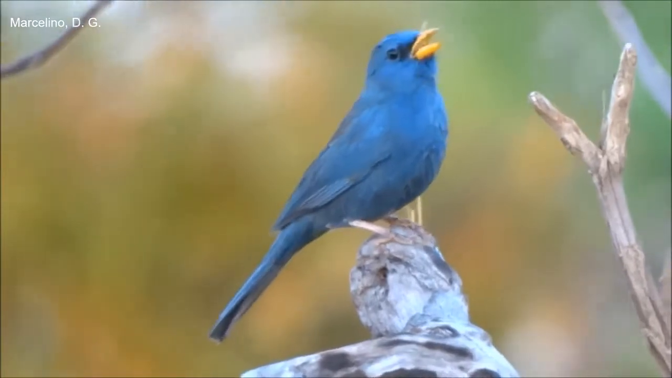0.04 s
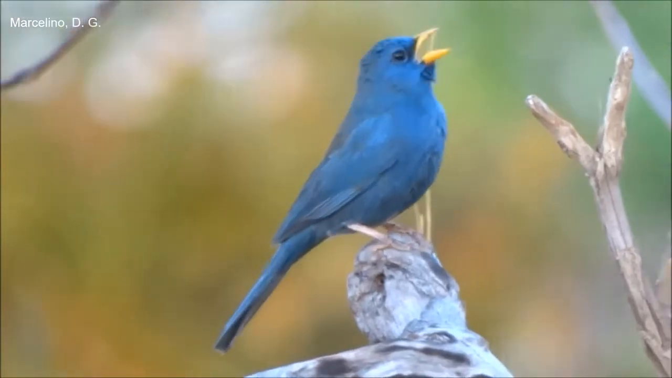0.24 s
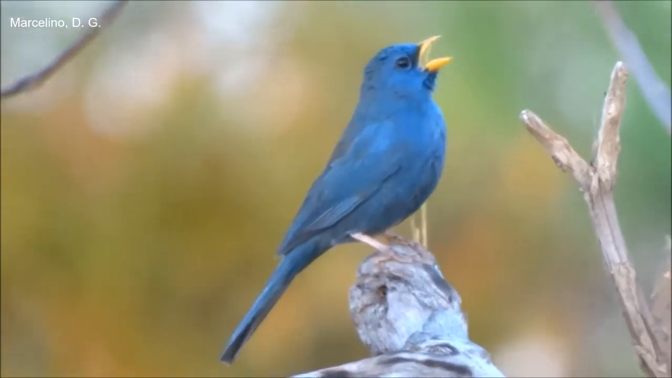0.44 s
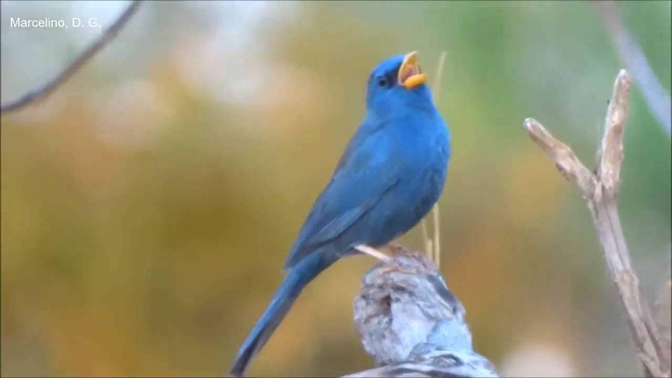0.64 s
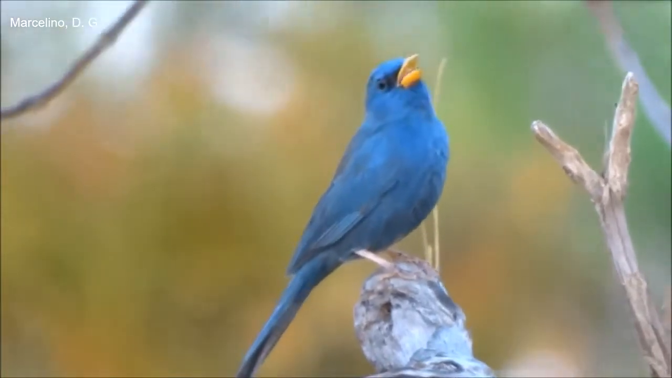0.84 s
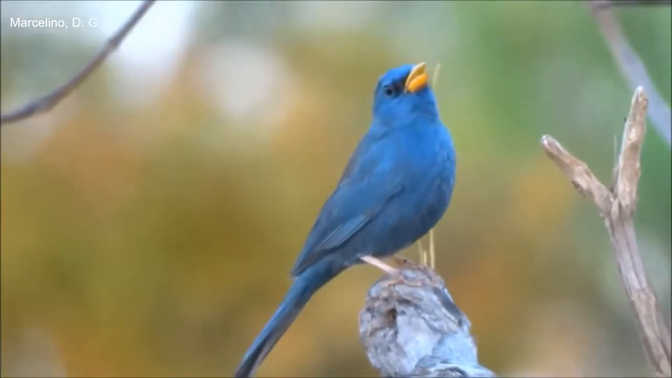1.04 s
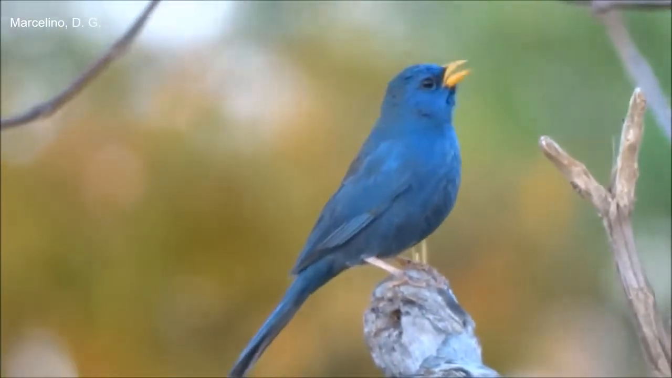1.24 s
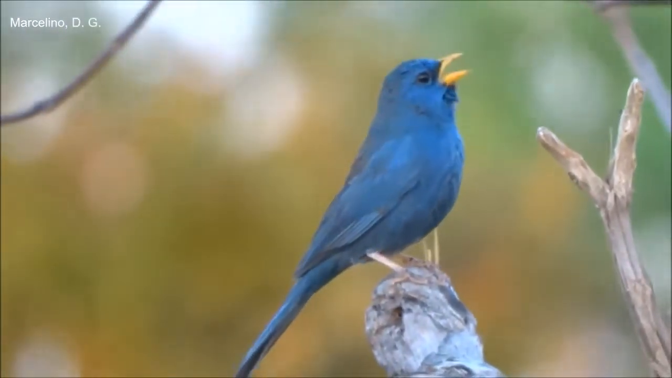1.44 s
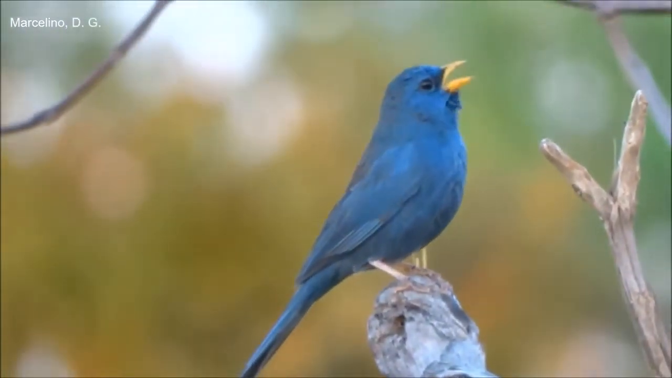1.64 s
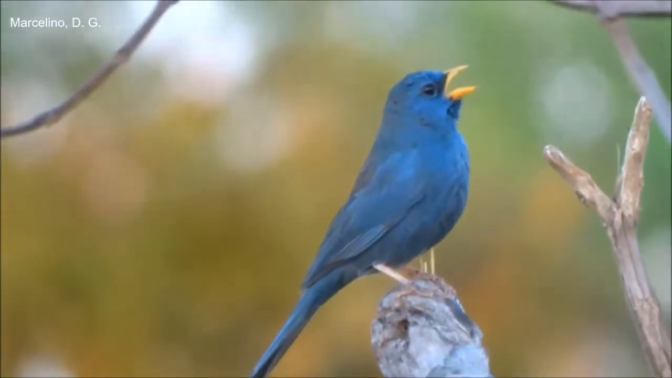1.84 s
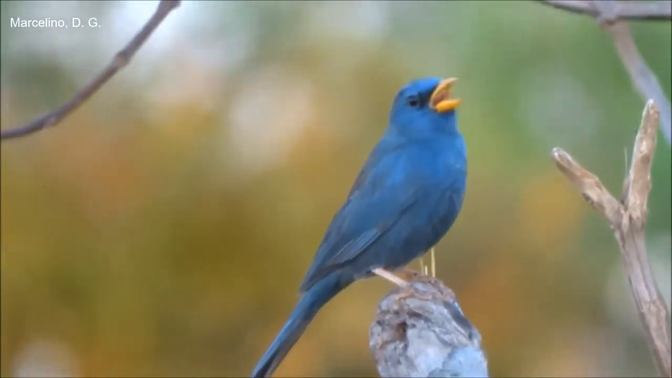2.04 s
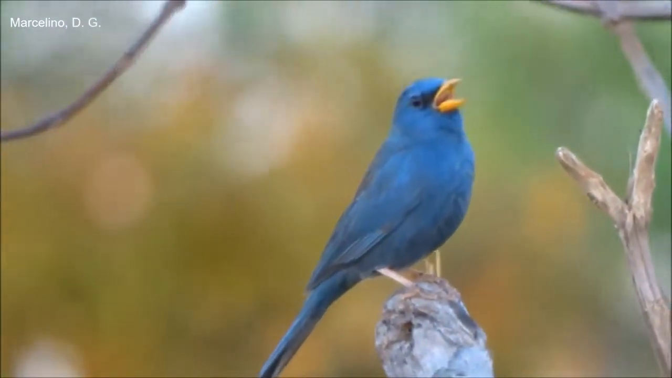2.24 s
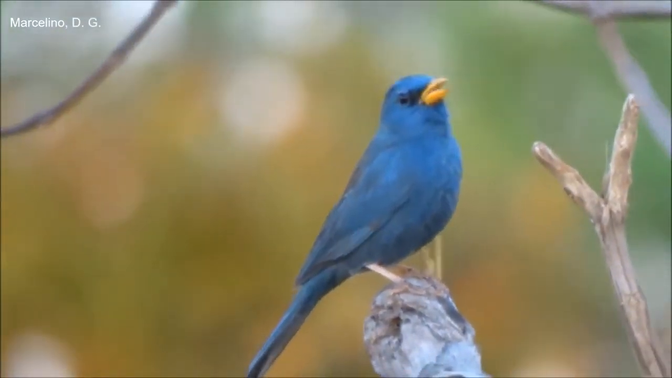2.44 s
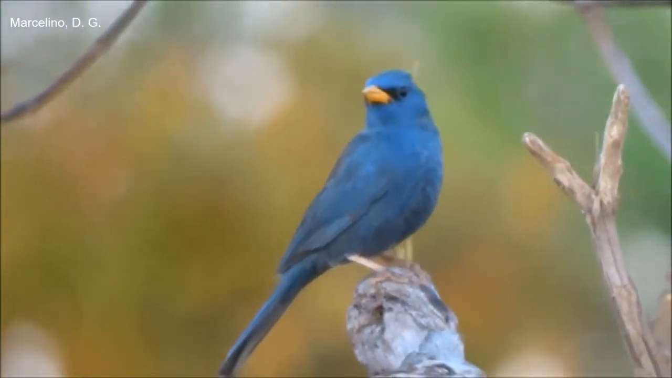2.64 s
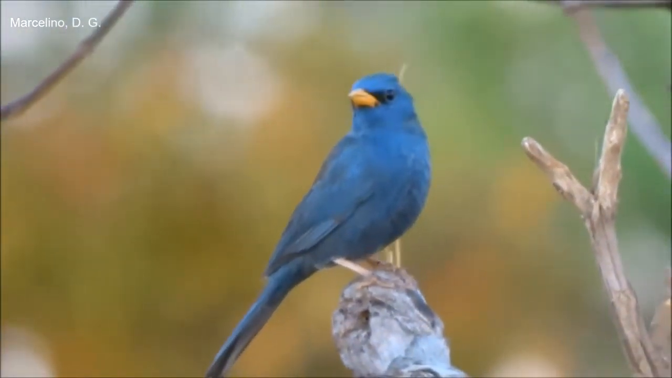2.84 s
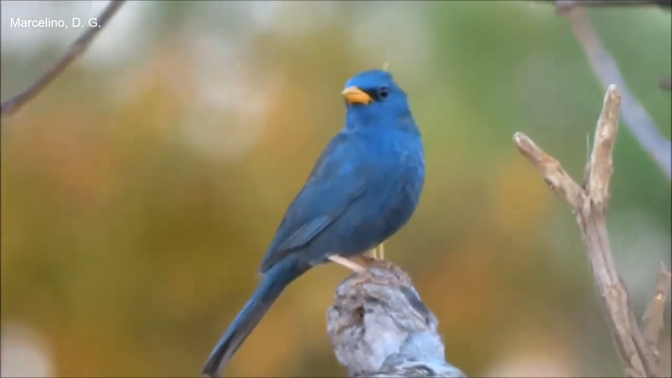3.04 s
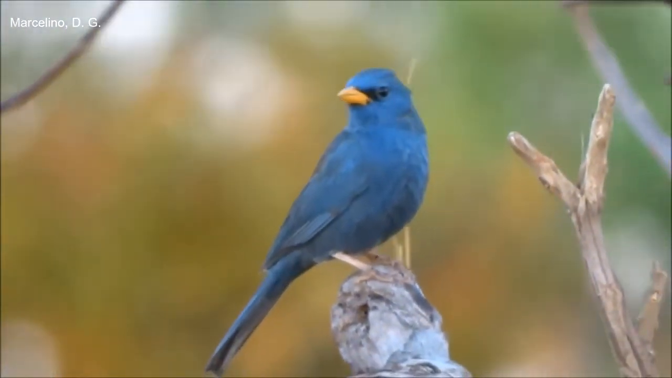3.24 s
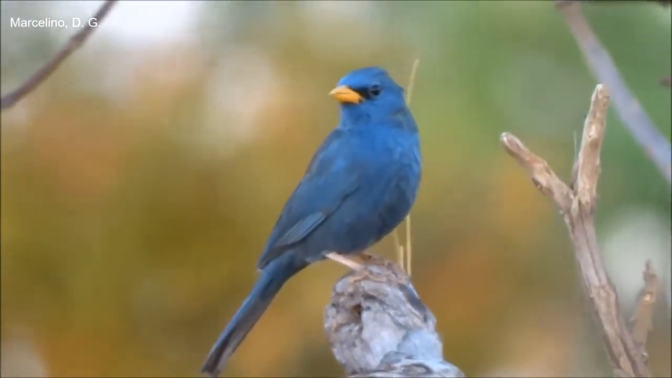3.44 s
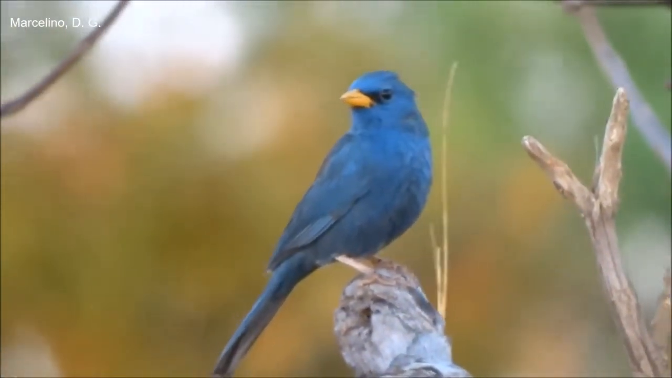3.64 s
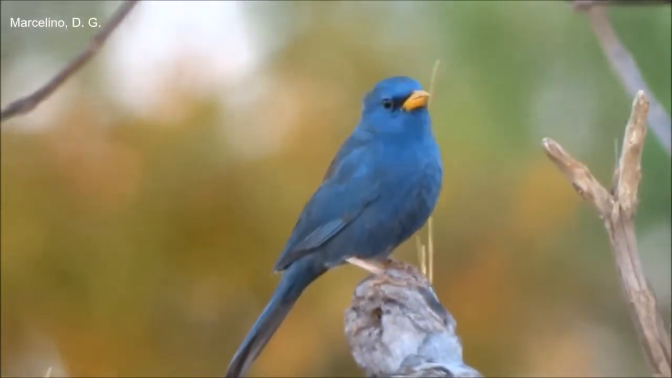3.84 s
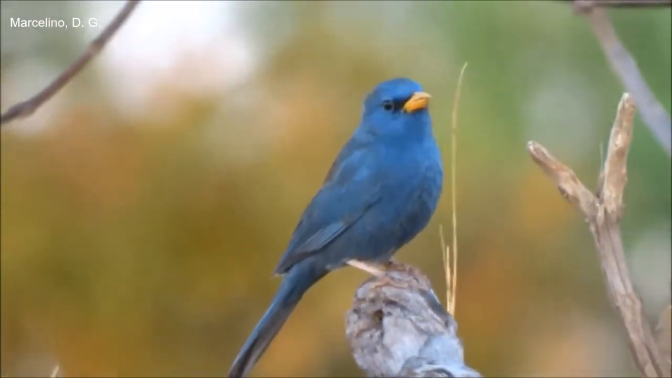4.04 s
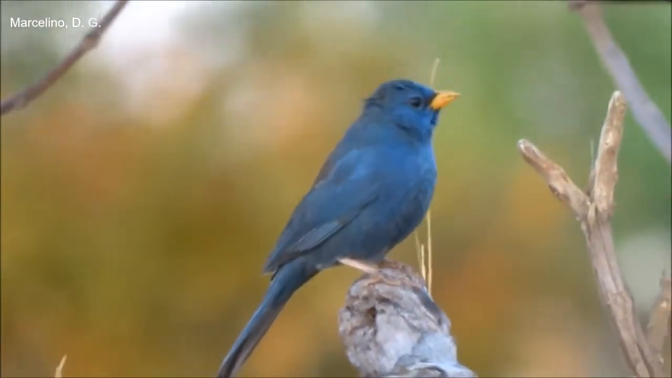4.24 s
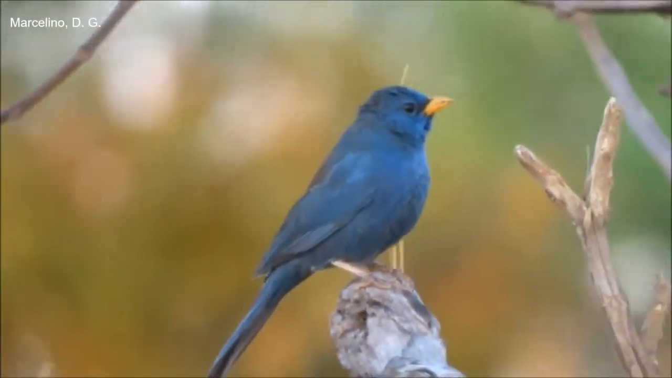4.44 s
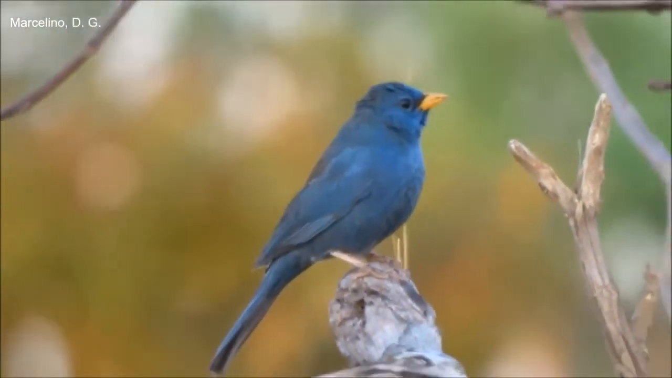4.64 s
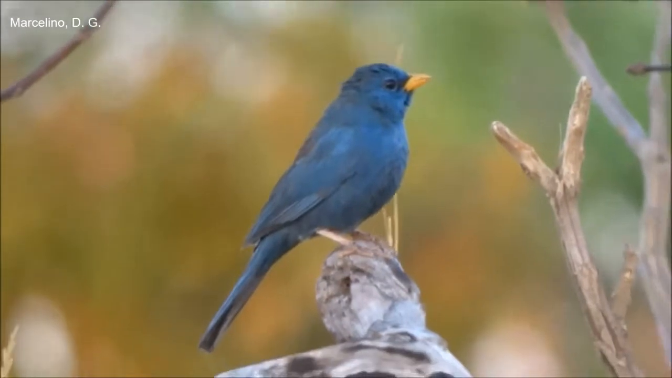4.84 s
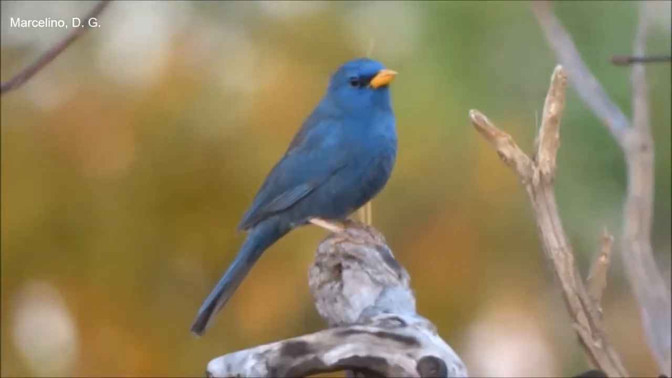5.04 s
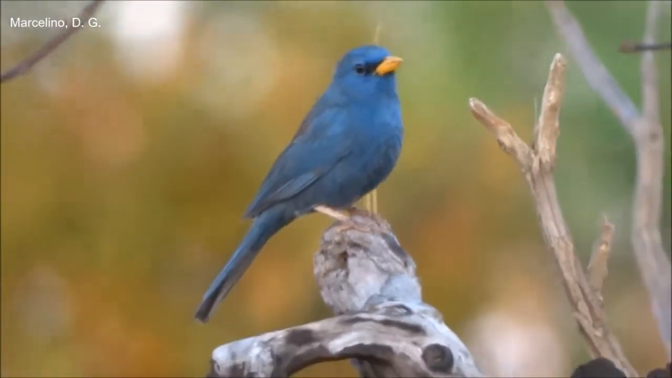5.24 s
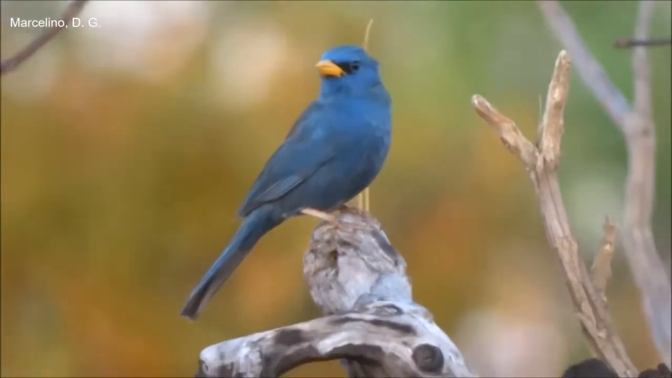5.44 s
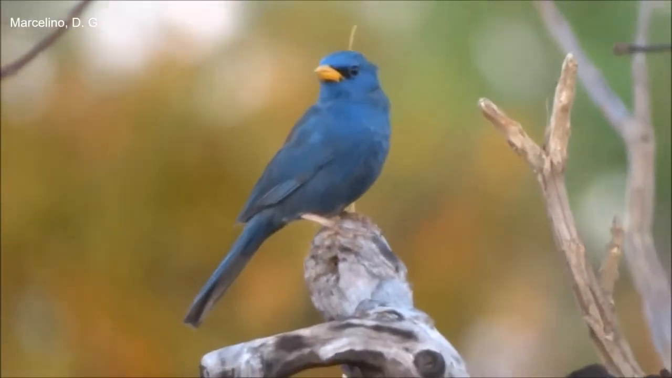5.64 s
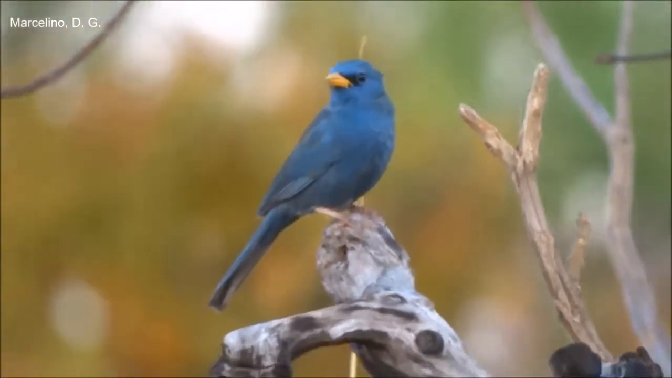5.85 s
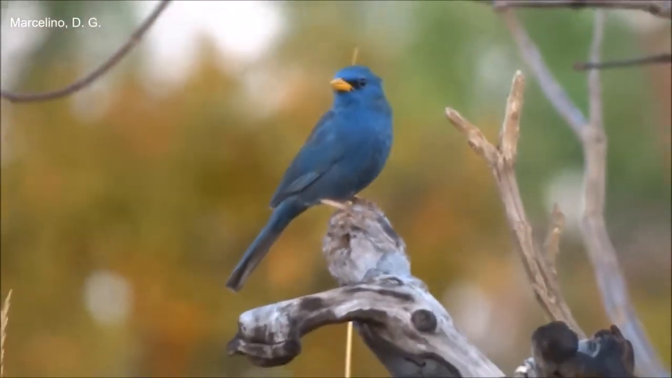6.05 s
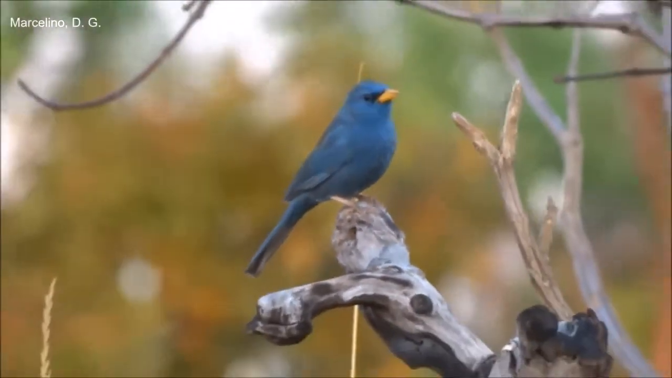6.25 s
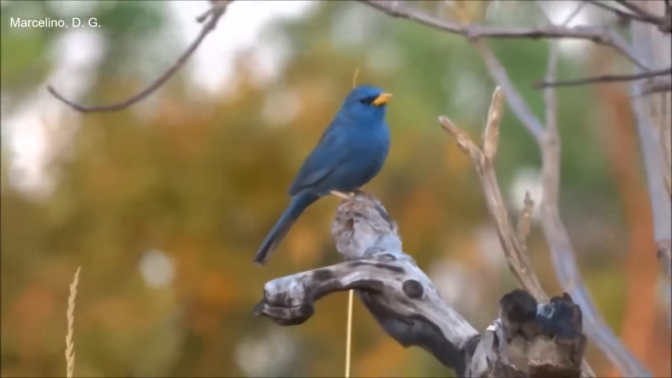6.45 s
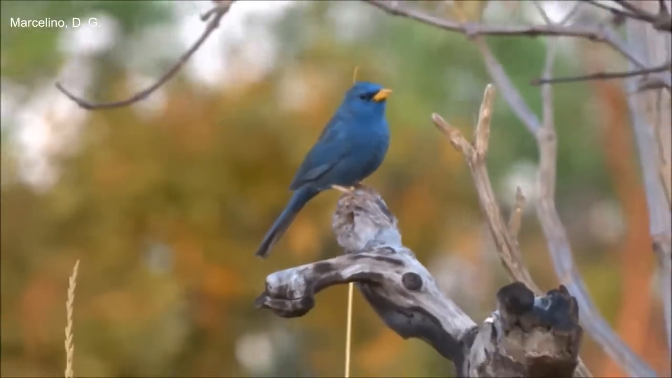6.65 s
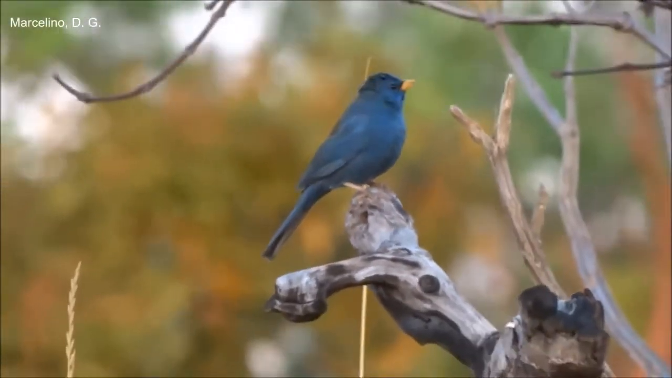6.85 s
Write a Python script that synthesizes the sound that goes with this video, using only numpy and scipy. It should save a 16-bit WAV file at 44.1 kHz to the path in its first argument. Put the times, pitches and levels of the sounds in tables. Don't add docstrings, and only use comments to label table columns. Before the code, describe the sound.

A small finch sings piercing, throbbing whistled sweeps that rise and fall over steady leaf hiss, then goes quiet in the breeze.

```python
import sys
import numpy as np
from scipy import signal
from scipy.fft import rfft, irfft, next_fast_len
from scipy.io import wavfile
from scipy.ndimage import uniform_filter1d, minimum_filter1d

SR = 44100
rng = np.random.default_rng(int(sys.argv[2]) if len(sys.argv) > 2 else 0)


def to_linear_factor(level_db):
    exponent = np.asarray(level_db, float) / 20
    return 10 ** exponent


def to_wav(sig):
    pcm = np.clip(np.atleast_2d(sig), -1, 1) * 32767
    pcm = np.round(pcm).astype(np.int16)
    wavfile.write(sys.argv[1], SR, pcm.T)


N = 304731
SIZE = next_fast_len(N)
T = np.arange(N) / SR
HZ = np.maximum(np.fft.rfftfreq(SIZE, 1 / SR), 1)

# (time [s], breeze level [dB], dry rustle level [dB])
BREEZE = [
    (0.0, -21.5, 1),
    (0.96, -21.5, 5),
    (1.0, -22.5, 6),
    (3.42, -23.5, -4.5),
    (4.35, -21, 2),
    (4.79, -23, -9),
    (5.74, -22.5, -7),
    (6.62, -25, 3),
    (6.91, -23, -10),
]
# (frequency [Hz], density [dB per Hz])
RUSH_COLOUR = [(25, -70), (90, -38), (130, -20.5), (220, -14), (350, -11.5), (465, -4), (960, 0),
               (1250, -4), (2000, -4), (2500, -8), (3200, -11), (5000, -26), (9000, -70), (13000, -110)]
# (frequency [Hz], density [dB per Hz])
TREBLE_COLOUR = [(2000, -32.5), (3000, -13.5), (3900, -7.5), (4300, -9.5), (4600, -13.5), (5200, -13.5),
                 (6200, -9), (7000, -14), (7950, -13.5), (8300, -21.5), (8700, -58), (12500, -110)]
# (frequency [Hz], density [dB per Hz])
SHEEN_COLOUR = [(7800, -54), (8400, -25), (9400, -23), (10500, -30), (11800, -39), (12300, -42),
                (12900, -60), (13500, -89), (17000, -110)]
# (frequency [Hz], density [dB per Hz])
RUSTLE_COLOUR = [(4100, -44), (4500, -18), (5400, -19.5), (6000, -36), (9000, -110)]
# (frequency [Hz], side minus mid [dB])
LEAF_WIDTH = [(60, -51), (300, -29), (900, -17), (2600, -12), (4500, -14), (7600, -18), (9500, -5),
              (12000, -12)]

# (time [s], length [s], start pitch [Hz], end pitch [Hz], level [dB])
FAR_CHIPS = [(.335, 0.089, 3900, 4140, -35), (.41, 0.018, 4800, 4810, -27), (.475, 0.017, 4720, 4900, -26),
             (.493, .014, 4900, 4780, -31), (.565, .015, 4850, 4900, -33), (.64, .022, 4470, 4820, -30),
             (.72, 0.04, 4500, 4870, -32), (.792, 0.035, 4450, 4700, -25), (0.882, 0.023, 4750, 4700, -18),
             (.966, .012, 5700, 5430, -26), (0.97, .014, 4750, 4480, -23), (1.028, .01, 5600, 5150, -26),
             (1.034, 0.009, 5200, 4500, -31), (1.043, .009, 4560, 4050, -25),
             (3.648, 0.077, 3720, 3870, -29.5), (3.717, 0.013, 4195, 4500, -31),
             (3.776, .014, 3680, 3850, -32), (3.72, .02, 4650, 4820, -28.5),
             (3.793, 0.024, 4780, 4860, -27), (3.872, 0.022, 4650, 4830, -26),
             (3.911, .018, 4720, 4900, -32), (3.949, 0.024, 4450, 4900, -25),
             (4.017, 0.03, 4300, 4780, -29.5)]

# (time [s], peak level [dB], left minus right [dB], ring [Hz])
TWIG_TICKS = [(.41, -46.5, 2, 12200), (1.3688, -33, -1, 13600), (1.4666, -38, 1, 13800),
              (1.6287, -28, -2, 9500), (1.6616, -39, 2, 13800), (1.8911, -42, 0, 13700),
              (2.9627, -36, 3, 14000), (3.51, -42, 0, 13800), (3.6845, -44, 7, 13800),
              (5.1243, -34, -3, 11000), (5.13, -30, 0, 4400)]

# (frequency [Hz], density [dB per Hz])
BUFFET_COLOUR = [(15, -36), (30, -24), (60, -7), (90, -3), (160, -6), (300, -36), (1000, -46), (8000, -110)]
# (frequency [Hz], density [dB per Hz])
EDDY_COLOUR = [(60, -36), (140, -3.5), (280, -6), (600, -3.5), (1000, -17), (1500, -26), (3000, -50),
               (9000, -110)]
# (time [s], rumble level [dB], half width [s], eddies over rumble [dB])
WIND_PUFFS = [(0, -57, .05, -15), (.48, -64, .08, -10), (.88, -65, .08, -1), (1.1, -68, .12, -1),
              (1.37, -55, 0.043, 10), (1.7, -56, .06, -13), (2.18, -40, .025, 16), (2.25, -42, 0.032, 1),
              (2.55, -49.5, 0.21, 2), (3, -49, .08, -1), (3.31, -49, 0.15, 6.5), (3.65, -46, 0.12, 7),
              (3.89, -43, 0.14, 2), (4.25, -46.5, 0.24, 3), (4.68, -51, 0.17, 12), (4.84, -42, 0.12, 3),
              (5.05, -61, 0.16, 13), (5.25, -51, 0.14, 8), (5.46, -53, 0.058, 7), (5.7, -50, 0.19, -2),
              (6.43, -63, .08, -1), (6.91, -64, .06, -8)]
# (time [s], peak level [dB], pitch [Hz], length [s], left minus right [dB])
PORT_KNOCKS = [
    (1.365, -36, 111, .02, -2),
    (2.163, -25, 230, 0.0081, 9),
    (2.182, -15, 390, 0.0081, 0),
    (2.189, -18.5, 280, 0.0096, 13),
    (2.185, -17, 730, .01, 5),
    (2.243, -38, 113.5, .03, 1),
    (3.672, -20, 298, 0.0072, 4),
    (4.674, -34, 120, 0.037, 3),
]

RETURN_MS = [2.786, 2.718, 1.781, .944, 3.221]
RETURN_SHARE = [.73, .2, .1, -.14, -.08]
# (time from bottom of hook [s], pitch [Hz], level [dB])
GRACE_NOTE = [
    (-.091, 6250, -36),
    (-.075, 5840, -20),
    (-.059, 5250, -27),
    (-.044, 4900, -26),
]
# (time from bottom of hook [s], pitch [Hz], level [dB])
HOOK_NOTE = [
    (-.042, 6800, -31),
    (-.028, 5950, -21.5),
    (-.015, 5570, -22),
    (0, 5390, -22.5),
    (.011, 5820, -14.5),
    (0.025, 6150, -19.5),
]
# (time of hook bottom [s], opening pitch shift [Hz], opening level [dB],
#           head sway delay at start [ms], head sway delay at end [ms])
SONG_PHRASES = [
    (-.1, 0, -2, -.005, -.014),
    (.239, 51, 2, -0.011, -0.0025),
    (1.481, -61, 0, 0.0075, -0.005),
    (1.774, -14, 1, 0.0045, -.012),
]
# (time [s], pitch [Hz])
SWEEP_PITCH = [
    [(.003, 6864), (.03, 7120)],
    [(.289, 6620), (.333, 6930), (.376, 7630), (.465, 8320), (.517, 8185), (.678, 6235), (.746, 5620),
     (.963, 4040), (1.09, 3540)],
    [(1.542, 6310), (1.571, 6890), (1.595, 6920)],
    [(1.857, 6750), (1.947, 7900), (2.016, 8320), (2.052, 8255), (2.169, 7185), (2.212, 6590),
     (2.409, 4913), (2.54, 4180), (2.582, 4050)],
]
# (time [s], level [dB])
SWEEP_EFFORT = [
    [(.003, -19.5), (.016, -21), (.03, -25)],
    [(.29, -18), (.313, -13), (.385, -12.5), (.418, -23), (.46, -21.5), (.538, -16.5), (.635, -4),
     (.81, -17), (1.09, -33)],
    [(1.544, -22), (1.565, -15.5), (1.59, -15), (1.596, -40)],
    [(1.84, -18), (1.918, -15), (1.985, -25), (2.03, -23.5), (2.075, -18), (2.172, -6.5), (2.272, -13),
     (2.42, -20), (2.582, -30)],
]
# (time [s], half width [s], pitch lift [Hz], swell [dB])
VOICE_CATCHES = [
    (.872, .035, 81, 5.5),
    (.93, 0.0255, 49, 6),
    (1.015, .035, 75, 8),
    (1.052, .01, -21, -8),
    (1.905, 0.022, 71, -0.5),
    (2.172, 0.019, 50, -2),
    (2.395, .025, 52, -2.5),
    (2.505, 0.016, 52, 2.5),
    (2.535, .008, -40, -4),
]


def unit(x):
    return x / np.sqrt(np.mean(x ** 2))


def curve(table, column):
    rows = np.array(table)
    return np.interp(T, rows[:, 0], rows[:, column])


def shape(points):
    rows = np.array(points)
    return np.interp(np.log(HZ), np.log(rows[:, 0]), rows[:, 1])


def band_rms(x, lo_hz, hi_hz):
    spectrum = rfft(x, SIZE)[(HZ > lo_hz) & (HZ < hi_hz)]
    return np.sqrt(2 * np.sum(np.abs(spectrum) ** 2) / SIZE / N)


def noise(db):
    return irfft(rfft(rng.standard_normal(SIZE)) * to_linear_factor(db), SIZE)[:N]


def mid_side_noise(db):
    return np.array([noise(db), noise(db + shape(LEAF_WIDTH))])


def walk(rate):
    hold = int(SR / rate)
    steps = np.repeat(rng.standard_normal(N // hold + 1), hold)
    return uniform_filter1d(uniform_filter1d(steps, hold), hold)[:N]


def pan(x, db):
    return x * to_linear_factor(np.array([[db], [-db]]) / 2)


def scatter(x, t60, wide):
    t = T[:SR // 2]
    mid, side = rng.standard_normal((2, len(t))) * to_linear_factor(-60 * t / t60) * (t > .004)
    tail = np.array([mid + wide * side, mid - wide * side]) / np.sqrt(np.sum(mid ** 2))
    return signal.fftconvolve(x[None], tail, axes=1)[:, :N]


def leaves(flicker_db=0.38):
    rush = 0
    for hz in 60 * 2. ** np.arange(8):
        window = np.cos(np.pi / 2 * np.clip(np.log2(HZ / hz), -1, 1))
        band = mid_side_noise(shape(RUSH_COLOUR) + 20 * np.log10(window + 1e-9))
        rush = rush + to_linear_factor(flicker_db * walk(3.595)) * band
    level, dry_db = curve(BREEZE, 1), curve(BREEZE, 2)
    breeze_db = level - level.mean()
    late_s = np.maximum(T - 5.7, 0)
    treble_db = 0.04 + 0.15 * breeze_db + 0.056 * dry_db - 2 * late_s
    sheen_db = 1.2 + 0.3 * breeze_db + 0.11 * dry_db - 1 * late_s
    treble = to_linear_factor(treble_db) * mid_side_noise(shape(TREBLE_COLOUR))
    sheen = to_linear_factor(sheen_db) * mid_side_noise(shape(SHEEN_COLOUR))
    rustle = to_linear_factor(dry_db) * mid_side_noise(shape(RUSTLE_COLOUR))
    foliage = rush + treble + sheen + rustle
    mid, side = to_linear_factor(level) * foliage / band_rms(rush[0], 400, 2500)
    return np.array([mid + side, mid - side])


def glints(width_hz=170, rare=1.15, rarer_early=.12, level_db=-65):
    out = 0
    for hz in (12750, 13100, 13500, 13900, 14250):
        gate = walk(30) > rare - rarer_early * np.tanh(T - 4.5)
        hiss = unit(noise(-200. * (abs(HZ - hz) > width_hz)))
        out = out + uniform_filter1d(1. * gate, size=300) * hiss
    return pan(to_linear_factor(level_db) * out, 0)


def far_bird(scrub_db=-11):
    voice = np.zeros(N)
    for s, length, start_hz, end_hz, db in FAR_CHIPS:
        on = (T > s) & (T < s + length)
        u = (T[on] - s) / length
        pitch = end_hz + (start_hz - end_hz) * ((1 - u) ** 3 + .25 * u ** 4)
        swell = np.sin(np.pi * u) ** .45
        voice[on] += np.sqrt(2) * to_linear_factor(db) * swell * np.sin(2 * np.pi * np.cumsum(pitch) / SR)
    return pan(voice, 1.5) + to_linear_factor(scrub_db) * scatter(voice, .25, .4)


def twigs(t60=.003, snap=.8):
    out, t = np.zeros((2, N + SR)), T[:SR // 50]
    for s, db, pan_db, hz in TWIG_TICKS:
        tick = np.sin(2 * np.pi * hz * t) * to_linear_factor(-60 * t / t60)
        tick[:2] += [snap, -snap]
        start = int(s * SR)
        out[:, start:start + len(t)] += pan(to_linear_factor(db + 8.0) * tick, pan_db)
    return out[:, :N]


def puffs(calm_db=-75, calm_eddy_db=-64):
    rumble, eddies = to_linear_factor(calm_db) ** 2, to_linear_factor(calm_eddy_db) ** 2
    for s, db, half_s, eddy_db in WIND_PUFFS:
        bell = np.exp(-2 * ((T - s) / half_s) ** 2)
        rumble = rumble + to_linear_factor(db) ** 2 * bell
        eddies = eddies + to_linear_factor(db + eddy_db) ** 2 * bell
    return np.sqrt(rumble), np.sqrt(eddies)


def wind(alike=.94):
    both, left, right = (unit(noise(shape(BUFFET_COLOUR))) * to_linear_factor(3 * walk(14)) for _ in range(3))
    rumble, eddies = puffs()
    apart = np.sqrt(1 - min(alike, 1) ** 2) * np.array([left, right])
    out = rumble * to_linear_factor(-2.5) * (alike * both + apart)
    flutter = [unit(noise(shape(EDDY_COLOUR))) * to_linear_factor(6 * walk(30)) for _ in range(2)]
    out = out + eddies * np.array(flutter)
    for s, db, hz, length, pan_db in PORT_KNOCKS:
        bell = np.exp(-4 * ((T - s) / length) ** 2)
        out = out + pan(to_linear_factor(db) * bell * np.cos(2 * np.pi * hz * (T - s)), pan_db)
    return out


def glide(t, s, hz):
    step = np.diff(s)
    chord = np.diff(hz) / step
    inner = (chord[:-1] * step[1:] + chord[1:] * step[:-1]) / (step[1:] + step[:-1])
    slope = np.r_[chord[0], inner, chord[-1]]
    k = np.clip(np.searchsorted(s, t) - 1, 0, len(step) - 1)
    u = np.clip((t - s[k]) / step[k], 0, 1)
    bend = (1 - u) * (slope[k] - chord[k]) - u * (slope[k + 1] - chord[k])
    return hz[k] + u * step[k] * (chord[k] + (1 - u) * bend)


def notes():
    for phrase, sweep, effort in zip(SONG_PHRASES, SWEEP_PITCH, SWEEP_EFFORT):
        s, shift_hz, db, sway_start, sway_end = phrase
        grace = np.add(GRACE_NOTE, [s, shift_hz, db])
        hook = np.add(HOOK_NOTE, [s, shift_hz, db])
        yield grace[:, :2], grace[:, ::2], [sway_start, sway_start]
        yield np.r_[hook[:, :2], sweep], np.r_[hook[:, ::2], effort], [sway_start, sway_end]


def finch(waver_hz=15., rasp_db=0.2, edge_s=.001, scrub_db=-15):
    phase, size, sway_ms = np.zeros(N), np.zeros(N), np.zeros(N)
    catch_s, half_s, lift_hz, swell_db = np.transpose(VOICE_CATCHES)
    catch = np.exp(-2 * ((T[:, None] - catch_s) / half_s) ** 2)
    waver = waver_hz * walk(120) + catch @ lift_hz
    swell = catch @ swell_db + rasp_db * walk(160)
    for tune, effort, sway_ends in notes():
        s, hz = tune.T
        begun = T > s[0] - edge_s
        on = begun & (T < s[-1] + edge_s)
        t = T[on]
        phase[on] = 2 * np.pi * np.cumsum(glide(t, s, hz) + waver[on]) / SR
        edge = np.clip(np.minimum(t - s[0], s[-1] - t) / edge_s + 1, 0, 1)
        size[on] = np.sqrt(2) * edge * to_linear_factor(np.interp(t, *effort.T) + swell[on])
        sway_ms[begun] = np.interp(T[begun], s[[0, -1]], sway_ends)
    voice = size * np.sin(phase)
    bounce = 0
    for delay_ms, share in zip(RETURN_MS, RETURN_SHARE):
        t = T - (delay_ms + sway_ms) / 1000
        bounce = bounce + share * np.interp(t, T, size, left=0) * np.sin(np.interp(t, T, phase))
    return pan(voice, -.2) + pan(bounce, -.6) + to_linear_factor(scrub_db) * scatter(voice, .25, .25)


def scene():
    return leaves() + glints() + far_bird() + twigs() + wind() + finch()


def roll_off(x):
    return signal.sosfilt(signal.butter(12, 15830, fs=SR, output="sos"), x)


def record(dry, top=1.0):
    room = np.minimum(1, top / (np.abs(dry).max(axis=0) + 1e-9))
    gain = uniform_filter1d(minimum_filter1d(room, size=400), size=200)
    return roll_off(dry * gain)


dry = scene()
out = record(dry)
to_wav(out)
```